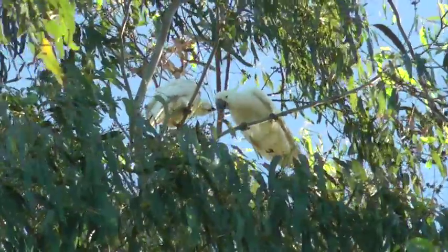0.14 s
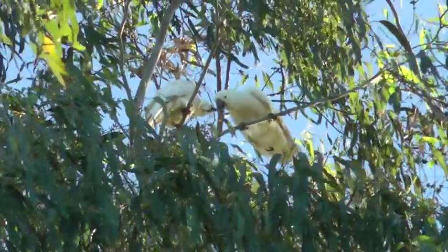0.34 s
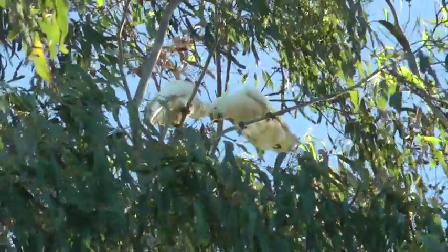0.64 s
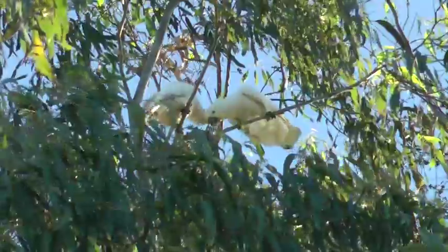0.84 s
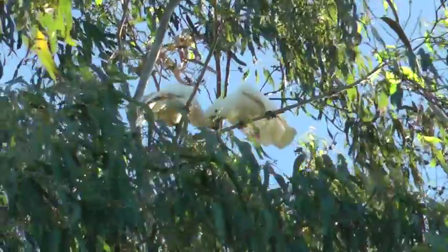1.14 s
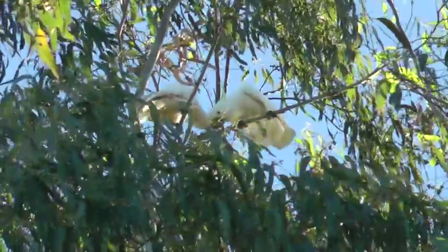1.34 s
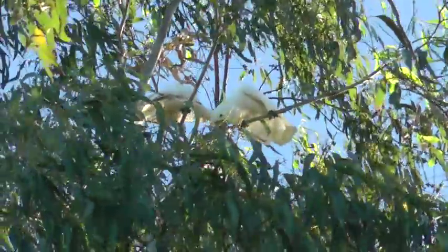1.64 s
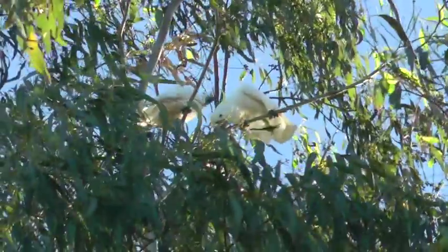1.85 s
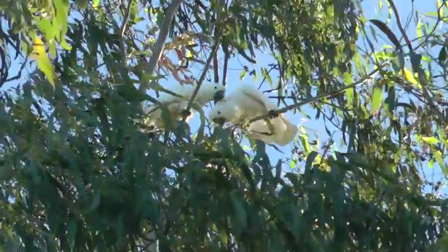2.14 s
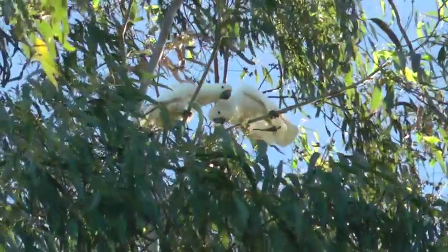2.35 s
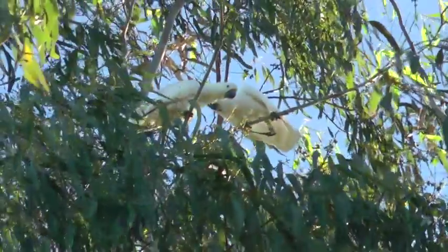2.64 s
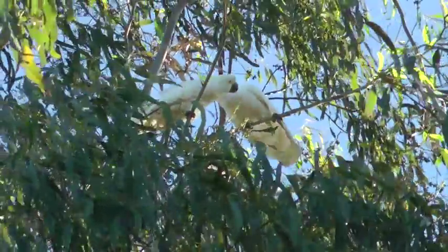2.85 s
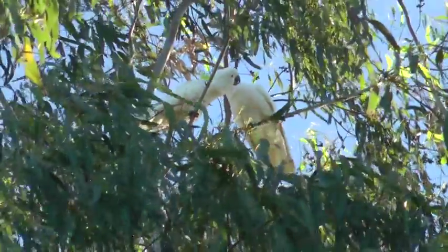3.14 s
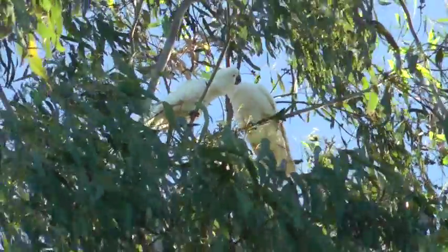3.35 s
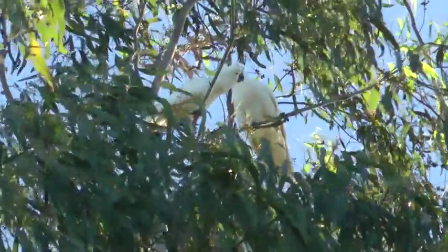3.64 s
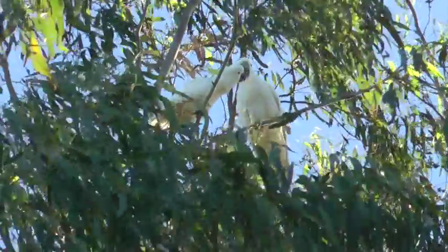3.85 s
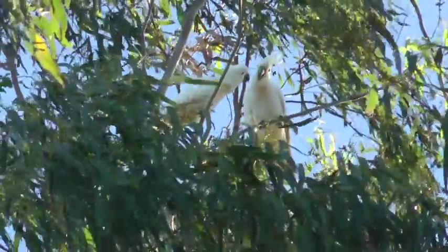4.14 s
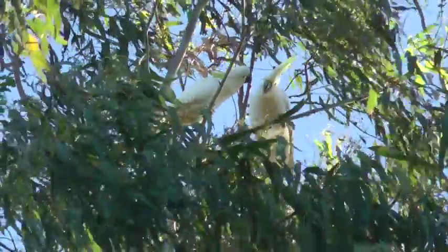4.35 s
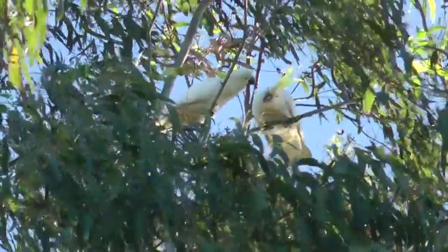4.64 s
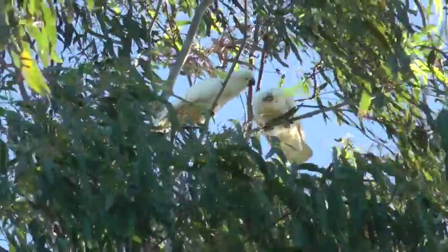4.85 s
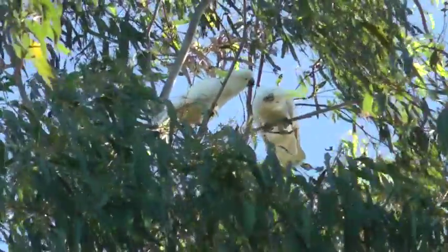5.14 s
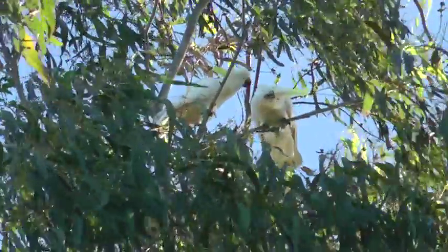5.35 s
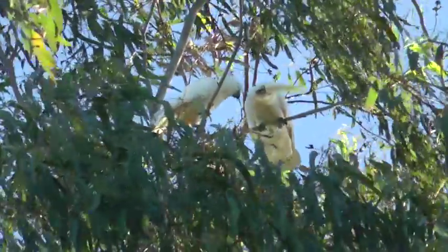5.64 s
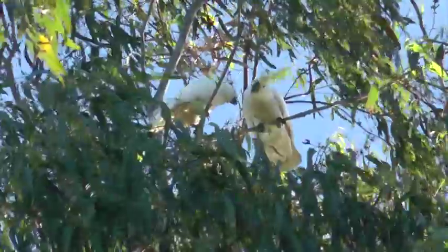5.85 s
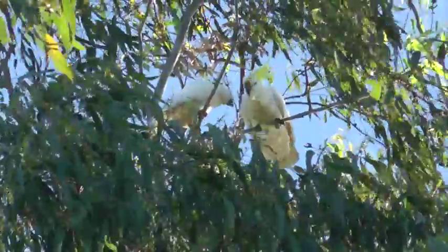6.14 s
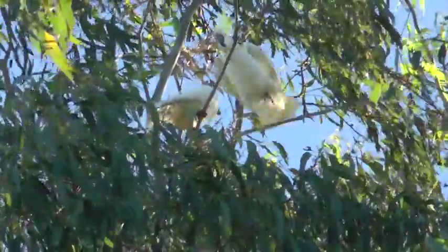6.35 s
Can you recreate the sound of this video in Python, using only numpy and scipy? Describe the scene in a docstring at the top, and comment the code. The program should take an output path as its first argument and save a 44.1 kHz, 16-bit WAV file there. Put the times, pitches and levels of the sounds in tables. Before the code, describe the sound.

Steady outdoor air and a faint, narrow insect hiss run throughout. In the first second come three thin, distant bird chirps and a brief dry leaf rustle, with more rustling around 1.3 seconds. A cockatoo high in a tree gives a soft, wheezy whine from 1.1 to 1.5 seconds, then a rising squeak at 1.7. Three loud, harsh screeches follow at about 2.3, 2.9 and 3.6 seconds, each just under half a second long. After a pause, two longer, hoarser, slightly quieter screeches come at 5.0 and 5.9, ending near 6.4 seconds. The two birds sit just right of centre, and their calls ring for about a second among the trees. From about 2 seconds, soft low wind puffs touch the microphone now and then, while a faint rumble and hum grow unevenly toward the end.

```python
"""Faint chirps and leaf rustles over outdoor air; then two cockatoos squabble high in a gum tree:
a wheezy whine, a rising squeak, five harsh screeches. A screech is a run of uneven slaps of the
syrinx, each with a puff of air, ringing in throat and beak. Close surfaces comb the calls and the
grove answers. Insects hiss, a low rumble grows, and wind puffs softly on the microphone."""
import sys
import numpy as np
from scipy import signal
from scipy.fft import rfft, irfft, next_fast_len
from scipy.io import wavfile
from scipy.ndimage import uniform_filter1d, map_coordinates

SR = 44100
rng = np.random.default_rng(int(sys.argv[2]) if len(sys.argv) > 2 else 0)


def master_out(mix):
    """Clip the mix to full scale and print it as 16-bit PCM to the path in sys.argv[1]."""
    frames = np.transpose(np.atleast_2d(mix))
    ceiling = np.clip(frames, -1, 1)
    pcm = np.round(ceiling * 32767).astype(np.int16)
    wavfile.write(sys.argv[1], SR, pcm)


N = 287190
T = np.arange(N) / SR
SIZE = 2 * next_fast_len(N // 2 + SR // 2)
HZ = np.maximum(np.arange(SIZE // 2 + 1) * SR / SIZE, 1)
ANTIPHASE = np.array([[1], [-1]])

# screeches (start [s], end [s], attack [s], relative level [dB], swell [dB], treble share [dB],
# brightening [dB], catch time [s], catch dip [dB])
SCREECHES = [(2.275, 2.692, 0.07, -17, 0, -18, 13, 2.47, -1),
             (2.912, 3.356, 0.023, -16.5, -0.5, -15, 5.5, 3.11, 2),
             (3.628, 4.1, .028, -16.5, -1.5, -15.5, 5, 3.79, 2.5),
             (4.958, 5.657, .03, -20, -1.5, -17.5, 2.5, 5.545, 1.5),
             (5.895, 6.426, 0.023, -21, -2.5, -17, -0.5, 6.25, 4)]
# voicing per screech (slap rate [1/s], rate spread [ratio], unevenness [dB], lock [0-1],
# windpipe round trip [ms], reflection [gain])
VOICING = [(186.5, .2, 3.5, 0.01, 0.84, -0.096), (201.7, .22, 5, 0, 0.75, -0.012),
           (205.1, .22, 3, 0, 0.68, -.18), (135.8, .25, 3, .95, 0.67, -0.2),
           (129.8, .22, 4, .95, 0.712, -0.17)]
# throat and beak modes, three postures (frequency [Hz], width [Hz], gain [dB])
THROAT_LOW = [(575, 130, -19.5), (750, 81, -8.5), (1250, 870, -27.5), (1794, 280, 1.5), (2354, 410, 2.5),
              (3180, 700, -5), (4380, 2000, -10), (5600, 760, -11.5), (7800, 330, -32.0), (9485, 569, -38)]
THROAT_WIDE = [(724, 260, -25.5), (838, 31, -12.5), (1240, 1240, -28.5), (1939, 273, -0.5), (2480, 595, -3),
               (3410, 900, -11), (4640, 1840, -17.5), (5940, 540, -17.5), (7060, 1600, -28),
               (9379, 1400, -36.5)]
THROAT_HOARSE = [(754, 67, -16), (834, 25, -9), (1320, 1860, -21.5), (1912, 477, 0.0), (2534, 410, -5),
                 (3340, 770, -7.5), (4900, 2020, -11.5), (6720, 400, -21), (7670, 510, -21),
                 (9350, 450, -33)]
# narrow extra mode per screech (frequency [Hz], gain [dB])
UNDERTONES = [(750, -26), (838, -38), (846, -12.5), (870, -17), (825, -6)]
# whine, its clear end, squeak (start [s], end [s], relative end level [dB], swell [dB], throb [dB],
# end rasp [0-1], crack [dB], decay [dB/s])
SOFT_NOTES = [(1.115, 1.45, -41.5, 8, 1, .75, -3, 600), (1.465, 1.526, -38, 1.5, .3, .01, 2.5, 500),
              (1.70, 1.896, -36.5, 8.5, 2, 0, 6, 258)]
# per note, at even time steps (pitch [Hz], ...)
GLIDES_HZ = [(1052, 1072, 1050, 1070, 1088), (895, 938, 935), (1170, 1160, 1222, 1262, 1282)]
# harmonics 1, 2, 3 ... (relative level [dB])
WHINE_PARTIALS_DB = [-28, -13, 0, -6, -18, -28]
SQUEAK_PARTIALS_DB = [-9, 0, -7, -7, -13, -22, -27]
# nearly closed beak, filters the rasp (frequency [Hz], gain [dB])
WHINE_BEAK = [(600, -24), (1000, -24), (1350, -17), (1900, -13), (2450, -9), (2900, -7), (3230, 0),
              (3700, -12), (4600, -20), (7000, -29), (12000, -44)]
SQUEAK_BEAK = [(700, -35), (1250, -19), (1750, -23), (2600, 4.5), (3000, 7), (3700, -5), (5000, -13),
               (7000, -22), (13000, -36)]
# other birds (start [s], length [s], pitch [Hz], level [dB])
CHIRPS = [(.06, 0.11, 6950, -73), (0.278, 0.068, 2313, -52), (.56, 0.18, 5030, -62.5)]
# brushed leaves and feathers (peak time [s], level [dB], rise [s], decay [s])
RUSTLES = [(.31, -54.5, 0.018, .04), (.343, -46.5, 0.0023, 0.091), (1.2, -58, 0.027, 0.038),
           (1.28, -49, 0.069, 0.067), (1.42, -52, 0.017, 0.13), (1.51, -65, .01, 0.054)]
# their hiss (frequency [Hz], gain [dB])
RUSTLE_SPECTRUM = [(1500, -9), (3000, -7), (4500, -5.5), (6500, -3), (9000, -11), (13000, -20),
                   (16000, -20)]
# close reflections (delay [ms], gain [ratio])
ECHOES = [(2.638, 0.18), (3.611, 0.2), (5.295, -0.016), (5.534, 0.26), (6.408, -0.15), (7.134, 0.56),
          (7.289, -0.089), (9.544, -0.13), (9.905, 0.37), (10.694, 0.11), (11.348, 0.16), (12.44, 0.12),
          (12.986, -0.37), (13.527, 0.22)]
# grove ring (frequency [Hz], T60 [s])
GROVE_T60 = [(500, 0.78), (2000, 1.01), (4000, 1.3), (7000, 0.96), (14000, 2.4)]
# bird balance (frequency [Hz], right boost and left cut [dB])
PAN = [(700, 1.1), (2000, .65), (2800, .5), (3800, .05)]
# wind on the microphone (time [s], level [dB], sigma [s], frequency [Hz], antiphase share [0-1])
WIND_PUFFS = [(2.163, -46, .008, 53.5, .6), (2.466, -35, .0055, 65, 0.97), (2.535, -50, .018, 65, .3),
              (3.253, -45, .004, 75, .1), (3.59, -37.5, .013, 102, 0.24), (3.622, -38, 0.0085, 113, 0.4),
              (3.818, -42, .015, 65, .85), (4.052, -39, 0.0063, 82.6, .4), (4.108, -40, .009, 99, 0.5),
              (4.999, -33.5, .005, 116, 0.3), (5.77, -32, .0065, 72, 0.7), (6.116, -33, 0.01, 88, 0.64),
              (6.303, -37, .007, 70, .5)]
# outdoor air (frequency [Hz], relative density [dB])
AIR_SPECTRUM = [(25, -6), (80, -2), (170, -4), (420, -1), (490, -6), (750, 0), (1050, -6), (1550, -7),
                (1900, -3.5), (3200, -9), (5000, -9), (7000, -14), (9000, -22), (14000, -26)]
# its left-right likeness (frequency [Hz], coherence [0-1])
AIR_COHERENCE = [(40, 0.49), (150, 0.71), (400, 0.52), (1000, 0.74), (3000, 1), (8000, 0.96), (12000, 1)]
# low background (time [s], rumble level [dB], hum base level [dB])
LOW_LEVELS = [(0, -69, -66), (1.4, -70, -68.5), (1.8, -58, -66), (3.9, -53, -66), (4.3, -61, -59.5),
              (4.8, -58, -59), (5.5, -56.5, -61), (6.5, -49, -52.5)]
# hum tones (frequency [Hz], offset [dB])
HUM_TONES = [(77, 3.5), (151, -6), (305, -4.5)]


def screeches(trim_db=-3.5, treble_boost_db=4.0, split_hz=4200, air_loss_hz=13000, undertone_width_hz=36,
              locked_onset_s=.17, lock_changes_per_s=16):
    """The syrinx drives the throat; the opening beak brightens it; windpipe echo ripples the treble."""
    low_band = 1 / (1 + (HZ / split_hz) ** 10)
    postures = (THROAT_LOW, THROAT_WIDE, THROAT_WIDE, THROAT_HOARSE, THROAT_HOARSE)
    out = 0
    for row, voicing, modes, (ring_hz, ring_db) in zip(SCREECHES, VOICING, postures, UNDERTONES):
        slaps_per_s, spread, uneven_db, max_lock, trip_ms, reflection = voicing
        gain, treble_share = screech_effort(*row)
        # hoarse screeches start as an even buzz, then slip in and out of it
        lock = max_lock * np.maximum(T < row[0] + locked_onset_s,
                                     np.clip(2 * drift(lock_changes_per_s), 0, 1))
        mode_gain = resonances(list(modes) + [(ring_hz, undertone_width_hz, ring_db)])
        throat = minimum_phase(mode_gain / (1 + (HZ / air_loss_hz) ** 8))
        windpipe = 1 + reflection * delay(trip_ms)
        source = syrinx(slaps_per_s, spread, uneven_db, lock)
        beak_hiss = rng.standard_normal(N)
        body = evened(through(source, throat * low_band))
        treble = evened(through(source + beak_hiss, throat * (1 - low_band) * windpipe))
        out = out + gain * from_db(trim_db) * (body + treble_share * from_db(treble_boost_db) * treble)
    return out


def screech_effort(start_s, end_s, attack_s, level_db, swell_db, treble_db, brighten_db, catch_s, dip_db,
                   onset_db=29, fade_in_s=.014, release_db_per_s=331, treble_linger_db_per_s=124):
    """Gain and treble share: effort climbs, wavers, catches once, releases; the hiss dies more slowly."""
    age_s, after_s = np.maximum(T - start_s, 0), np.maximum(T - end_s, 0)
    from_middle = progress(start_s, end_s) - .5
    catch_db = dip_db * bell(catch_s, sigma_s=.019)
    hold_db = level_db + swell_db * from_middle - catch_db + .5 * drift(25)
    envelope_db = hold_db - onset_db * np.exp(-age_s / attack_s) - release_db_per_s * after_s
    gain = progress(start_s - fade_in_s, start_s) * from_db(envelope_db)
    return gain, from_db(treble_db + brighten_db * from_middle + treble_linger_db_per_s * after_s)


def syrinx(slaps_per_s, spread, uneven_db, lock=0, puff_s=.0032, soft_hz=4000, leak=.5):
    """Soft slaps, each with a turbulent puff; unless locked they stumble and more air leaks."""
    loose = 1 - .85 * lock
    rate_hz = slaps_per_s * np.exp(spread * loose * drift(2 * slaps_per_s))
    cycles = np.floor(np.cumsum(rate_hz) / SR)
    strength = from_db(uneven_db * loose * np.clip(rng.standard_normal(N), -2, 2))
    slaps = np.diff(cycles, prepend=0) * strength
    puffs = unit_rms(signal.lfilter([1], [1, -np.exp(-1 / (puff_s * SR))], slaps))
    closures = signal.sosfilt(signal.butter(1, soft_hz, fs=SR, output="sos"), unit_rms(slaps))
    return (.52 + .2 * lock) * closures + (puffs + leak * loose) * rng.standard_normal(N)


def beak_wander(x, sway_s=.0004, moves_per_s=14):
    """Tongue and beak never hold still: all resonances slide together by about a percent."""
    shift_s = uniform_filter1d(sway_s * drift(moves_per_s), SR // 40)
    return map_coordinates(x, [(T + shift_s) * SR], order=3)


def soft_call(note, glide_hz, partials_db, beak, trim_db=-1.5, full_db=-37, dull_above_hz=4200,
              shimmer_db=3.0, split_ratio=4 / 3, split_db=-6, attack_s=.0071):
    """A clear note breaks into rasp as the membranes lose rhythm; when weak, its top partials fade."""
    pitch_hz, level_db, rasp, cracked = note_shape(*note, glide_hz)
    jitter = (.007 + .0385 * rasp) * drift(500)
    phase = 2 * np.pi * np.cumsum(pitch_hz * (1 + jitter)) / SR
    weak_db = .8 * np.minimum(level_db - full_db, 0)
    tone = cracked * from_db(split_db) * np.sin(split_ratio * phase)   # split off by the crack
    for k, partial_db in enumerate(partials_db, 1):
        dull_db = weak_db * (k * pitch_hz > dull_above_hz)
        tone += from_db(partial_db + dull_db + shimmer_db * drift(90)) * np.sin(k * phase)
    wheeze = through(syrinx(slaps_per_s=260, spread=.3, uneven_db=3.0), from_db(at_hz(beak)))
    gain = progress(note[0] - attack_s, note[0]) * from_db(level_db + trim_db)
    return gain * ((1 - rasp) * evened(tone) + np.sqrt(rasp) * evened(wheeze))


def note_shape(start_s, end_s, end_db, swell_db, throb_db, end_rasp, crack_db, decay_db_per_s, glide_hz,
               throb_s=.0614, crack_s=.013, crack_rasp=.6, crack_leap=.025):
    """A soft note glides, swells and throbs, then cracks upward and dies."""
    along, cracked = progress(start_s, end_s), progress(end_s, end_s + crack_s)
    level_db = end_db - swell_db * (1 - along)
    level_db += throb_db * np.cos(2 * np.pi * np.minimum(T - end_s, 0) / throb_s)
    level_db += crack_db * progress(end_s - crack_s / 2, end_s)
    level_db -= decay_db_per_s * np.maximum(T - end_s, 0)
    pitch_hz = np.interp(along, np.linspace(0, 1, len(glide_hz)), glide_hz) * (1 + crack_leap * cracked)
    rasp = np.maximum(end_rasp * along, crack_rasp * cracked)
    return pitch_hz, level_db, rasp, cracked


def rustles(grain_db=1.5):
    """Each brush of leaf or feather is a quick swell of dry, grainy hiss."""
    swell = sum(from_db(db) * np.exp(-np.maximum((peak_s - T) / rise_s, (T - peak_s) / decay_s))
                for peak_s, db, rise_s, decay_s in RUSTLES)
    return swell * unit_rms(noise(from_db(at_hz(RUSTLE_SPECTRUM))) * from_db(grain_db * drift(700)))


def chirps(quaver=.0126):
    """Thin, quavering whistles of far birds."""
    phase_per_hz = 2 * np.pi * np.cumsum(1 + quaver * drift(340)) / SR
    out = 0
    for start_s, length_s, hz, db in CHIRPS:
        arch = np.sin(np.pi * progress(start_s, start_s + length_s))
        out = out + from_db(db) * np.sqrt(2) * arch * np.sin(hz * phase_per_hz)
    return out


def close_reflections(x, strength=1, rough_hz=4200):
    """Short echoes comb the sound; rough surfaces scatter away their top."""
    echoes = sum(gain * delay(ms) for ms, gain in ECHOES)
    return through(x, 1 + strength * echoes / (1 + (HZ / rough_hz) ** 4) ** .35)


def near_leaves(x, side_db=-13.0, decay_s=.017, narrow_hz=3300, treble_floor=.16):
    """Foliage round the birds scatters a brief spray, opposite at the two ears."""
    spray = unit_midband(rfft(rng.standard_normal(N) * np.exp(-T / decay_s), SIZE))
    rolloff = treble_floor + 1 / np.hypot(1, (HZ / narrow_hz) ** 4)
    return from_db(side_db) * through(x, spray * rolloff) * ANTIPHASE


def grove(x, wet_db=-6.5, width=.47, narrow_hz=3200, build_s=.0023, dull_hz=6000):
    """A diffuse, dull tail from the grove; its stereo width is narrowed in the treble."""
    hz, age_s, cells = signal.stft(rng.standard_normal((2, SR)), SR, nperseg=256)
    t60_s = at_hz(GROVE_T60, hz + 1)[:, None]
    tail = signal.istft(cells * from_db(-60 * age_s / t60_s) * (1 - np.exp(-age_s / build_s)))[1]
    response = unit_midband(rfft(tail, SIZE) / np.hypot(1, (HZ / dull_hz) ** 2))
    response[1] *= width / np.hypot(1, (HZ / narrow_hz) ** 4)
    mid, side = from_db(wet_db) * through(x, response)
    return mid + side * ANTIPHASE


def wind_puffs():
    """Each puff is a brief low swing of pressure, out of step at the two microphone ports."""
    out = 0
    for time_s, db, sigma_s, hz, opposite in WIND_PUFFS:
        phase = 2 * np.pi * hz * (T - time_s)
        swing = np.sqrt(1 - opposite) * np.sin(phase) + np.sqrt(opposite) * np.cos(phase) * ANTIPHASE
        out = out + from_db(db) * np.sqrt(2) * bell(time_s, sigma_s) * swing
    return out


def air(mid_db=-49.5):
    """Far outdoor noise, lightly combed, wider in the bass."""
    colour, coherence = from_db(at_hz(AIR_SPECTRUM)), at_hz(AIR_COHERENCE)
    mid = through(rng.standard_normal(N), colour)
    side = through(rng.standard_normal(N), colour * np.sqrt((1 - coherence) / (1 + coherence)))
    return from_db(mid_db) * (close_reflections(mid, strength=.28) + side * ANTIPHASE) / np.std(mid)


def insects(centre_hz=3880, width_hz=480, level_db=-58):
    """A steady, narrow band of hiss."""
    return from_db(level_db) * noise(resonances([(centre_hz, width_hz, 0)]))


def rumble_and_hum(rumble_hz=42, width_hz=130, waver_db=2.0):
    """Wide low noise and a centred, wavering hum; both grow unevenly."""
    times_s, *levels_db = np.transpose(LOW_LEVELS)
    rumble_db, hum_db = [np.interp(T, times_s, db) for db in levels_db]
    band = resonances([(rumble_hz, width_hz, 0)])
    rumble = from_db(rumble_db) * np.array([noise(band), noise(band)])
    hum = sum(from_db(hum_db + db + waver_db * drift(7.8)) * np.sin(2 * np.pi * hz * T + drift(4.2))
              for hz, db in HUM_TONES)
    return rumble + hum


def motor_whine(pitch_hz=420, level_db=-66.5):
    """A small motor's faint tone, opposite in the two channels."""
    return from_db(level_db) * np.sqrt(2) * np.sin(2 * np.pi * pitch_hz * T) * ANTIPHASE


def from_db(db):
    """Decibels to gain."""
    return 10 ** (np.asarray(db) / 20)


def unit_rms(x):
    """Scale to unit power."""
    return x / np.sqrt(np.mean(x ** 2) + 1e-20)


def unit_midband(response):
    """Scale to unit power gain over 1.5-3.5 kHz."""
    return response / np.sqrt(np.mean(np.abs(response[..., (HZ > 1500) & (HZ < 3500)]) ** 2))


def evened(x, window_s=.016):
    """Hold short-term power at 1; keep the fast grain."""
    return x / np.sqrt(np.abs(uniform_filter1d(x ** 2, int(window_s * SR))) + 1e-9)


def progress(start_s, end_s):
    """Clamped ramp, 0 to 1."""
    return np.clip((T - start_s) / max(end_s - start_s, 1e-3), 0, 1)


def bell(centre_s, sigma_s):
    """Gaussian swell, peak 1."""
    return np.exp(-.5 * ((T - centre_s) / sigma_s) ** 2)


def drift(knots_per_s):
    """Random wander, unit RMS."""
    knots = rng.standard_normal(int(N / SR * knots_per_s) + 3)
    return unit_rms(np.interp(T * knots_per_s, np.arange(len(knots)), knots))


def noise(gain):
    """Coloured noise, unit RMS."""
    return unit_rms(through(rng.standard_normal(N), gain))


def at_hz(points, hz=HZ):
    """Read a table along log frequency."""
    knots_hz, values = np.transpose(points)
    return np.interp(np.log(hz), np.log(knots_hz), values)


def through(x, response):
    """Apply a frequency response."""
    return irfft(rfft(x, SIZE) * response, SIZE)[..., :N]


def delay(ms):
    """Response of a pure delay."""
    return np.exp(-2j * np.pi * HZ * ms / 1000)


def resonances(modes):
    """Gain of a set of steep-sided resonances."""
    return np.sqrt(sum(from_db(db) ** 2 / (1 + ((HZ ** 2 - hz ** 2) / (HZ * width_hz)) ** 2) ** 2
                       for hz, width_hz, db in modes))


def minimum_phase(gain):
    """Response with this gain that rings after a blow, never before."""
    cepstrum = irfft(np.log(gain + 1e-6))
    cepstrum[1:SIZE // 2] *= 2
    cepstrum[SIZE // 2 + 1:] = 0
    return np.exp(rfft(cepstrum))


def scene(head_down_db=7.0, scatter_low_hz=1500):
    """Birds just right of centre; the soft calls, made head down, arrive more by way of the grove."""
    facing = beak_wander(screeches()) + rustles() + chirps()
    whine, squeak = (WHINE_PARTIALS_DB, WHINE_BEAK), (SQUEAK_PARTIALS_DB, SQUEAK_BEAK)
    soft = sum(soft_call(note, glide_hz, *voice)
               for note, glide_hz, voice in zip(SOFT_NOTES, GLIDES_HZ, (whine, whine, squeak)))
    direct = facing + soft
    # long waves slip past the leaves
    scattered = through(facing + from_db(head_down_db) * soft, HZ / np.hypot(HZ, scatter_low_hz))
    birds = close_reflections(direct) + near_leaves(direct) + grove(scattered)
    panned = through(birds, from_db(at_hz(PAN) * [[-1], [1]]))
    return panned + wind_puffs() + air() + insects() + rumble_and_hum() + motor_whine()


def record(dry, cutoff_hz=15750, edge_hz=100):
    """Steep low-pass."""
    return through(dry, np.clip((cutoff_hz - HZ) / edge_hz, 0, 1))


dry = scene()
out = record(dry)
master_out(out)
```